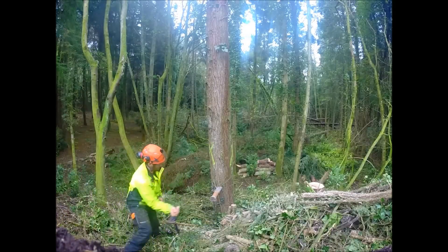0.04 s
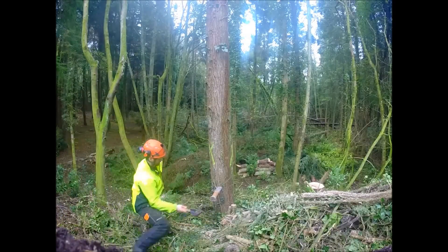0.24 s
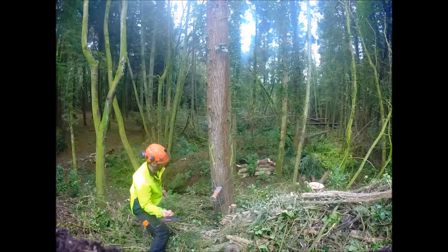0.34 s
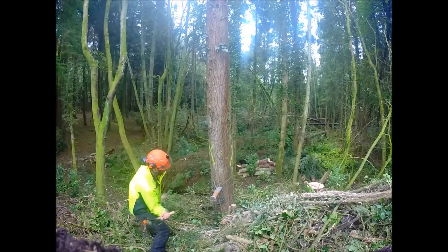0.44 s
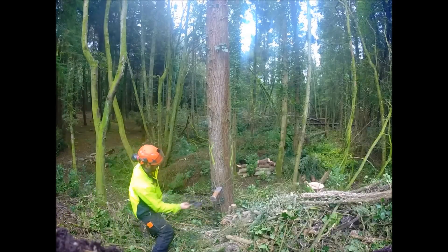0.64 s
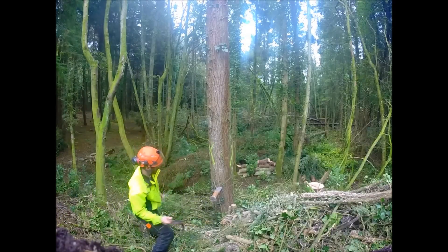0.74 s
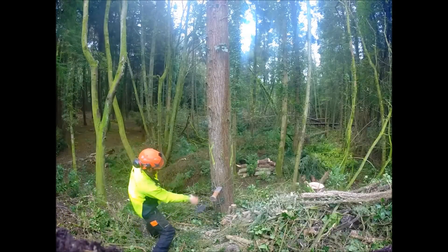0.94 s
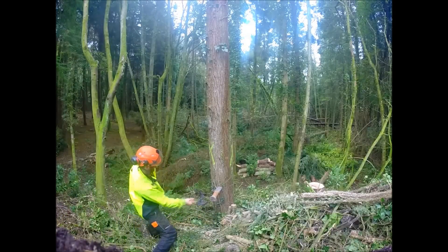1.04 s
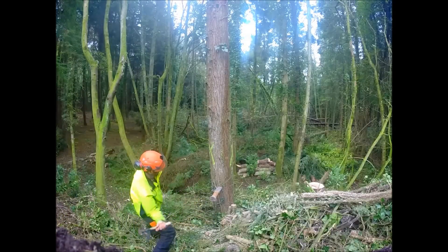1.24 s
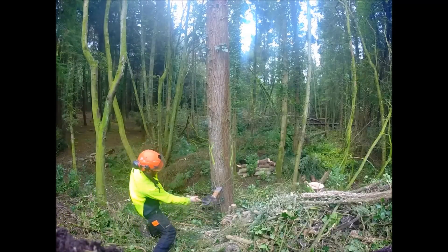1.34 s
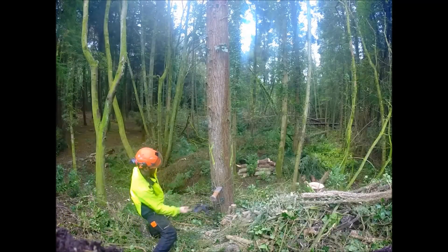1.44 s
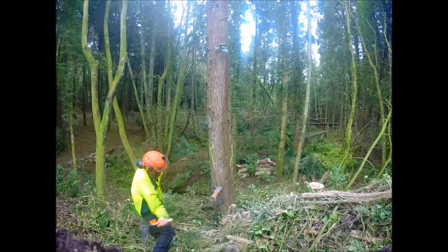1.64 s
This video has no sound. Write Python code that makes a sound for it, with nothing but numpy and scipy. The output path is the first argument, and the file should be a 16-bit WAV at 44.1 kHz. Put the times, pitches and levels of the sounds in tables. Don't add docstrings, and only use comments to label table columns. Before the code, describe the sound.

Hammer strikes a metal wedge in a standing tree, four even cracking blows in quiet woods

```python
import sys
import numpy as np
from scipy import signal
from scipy.fft import rfft, irfft
from scipy.io import wavfile
from scipy.ndimage import uniform_filter1d

SR = 44100
rng = np.random.default_rng(int(sys.argv[2]) if len(sys.argv) > 2 else 0)


def persist_wave(psi):
    counts = np.round(np.clip(psi, -1, 1) * 32767).astype(np.int16)
    wavfile.write(sys.argv[1], SR, np.atleast_2d(counts).T)


def volts_from_decibels(level):
    exponent = np.asarray(level, float) / 20
    return 10 ** exponent


N = 74970


def evened(x):
    return x / np.sqrt(np.mean(x ** 2) + 1e-20)


def read(points, hz):
    f, value = np.transpose(points)
    return np.interp(np.log(hz + 1), np.log(f + 1), value)


def along(curve):
    s, db = np.transpose(curve)
    return volts_from_decibels(np.interp(np.arange(N) / SR, s, db))


def add(mix, s, sound):
    part = mix[round(s * SR):][:len(sound)]
    part += sound[:len(part)]


def noise(colour, count=N):
    hz = np.fft.rfftfreq(count, 1 / SR)
    return evened(irfft(rfft(rng.standard_normal(count)) * volts_from_decibels(read(colour, hz)), count))


def band(hz, wide_hz, count=N):
    f = np.fft.rfftfreq(count, 1 / SR)
    resonance = 1 + ((f - hz) / wide_hz * 2) ** 2
    return evened(irfft(rfft(rng.standard_normal(count)) / resonance, count))


def strike(t, rise_s, t60):
    rise = np.sin(np.pi / 2 * np.minimum(t / rise_s, 1)) ** 2
    return rise * volts_from_decibels(-60 * np.maximum(t - rise_s, 0) / t60)


def lumps(span_s, depth_db):
    size = max(round(span_s * SR), 1)
    slow = uniform_filter1d(uniform_filter1d(rng.standard_normal(N), size), size)
    return volts_from_decibels(depth_db * evened(slow))


# (f/Hz, level/dB per Hz)
AIR = [(25, 19), (70, 4), (230, -1), (800, -4.5), (2000, -4), (3000, -8), (6000, -23), (16500, -46)]


def quiet_air():
    air = volts_from_decibels(-54) * noise(AIR) * lumps(0.1, 1.0)
    hollow = volts_from_decibels(-61.5) * band(1826, 350) * lumps(0.0086, 0.93)
    return air + hollow


# (t/s, level/dB)
SCUFF = [(0, -48), (.09, -49), (.15, -48.5), (.2, -50), (.45, -55.5), (.56, -47), (.62, -54), (.85, -56.5),
         (.97, -47), (1.05, -52.5), (1.25, -61.5), (1.35, -48), (1.45, -60.5), (1.7, -58.5)]
# (f/Hz, level/dB per Hz)
BRUSH = [(18, -34), (30, -5), (347, -5.5), (779, -8.5), (1100, -9), (1890, -14), (2430, -17), (3000, -41),
         (3900, -62), (6600, -120)]


def boots_in_brush():
    return volts_from_decibels(-3.0) * along(SCUFF) * noise(BRUSH) * lumps(0.0033, 2.0)


# (t/s, level/dB)
SWISH = [(0, -62.5), (.08, -62), (.17, -63), (.29, -73.5), (.35, -55.5), (.42, -59.5), (.47, -65.5),
         (.58, -61.5), (.75, -71), (.92, -66.5), (1.0, -61), (1.15, -74), (1.3, -69.5), (1.4, -65),
         (1.55, -72), (1.7, -67.5)]
# (f/Hz, level/dB per Hz)
CLOTH = [(1760, -26), (3000, -5), (4190, 2), (5120, -4), (8500, -3), (11600, -11), (13400, -8.5),
         (15800, -21), (16500, -41)]
# (t/s, share of treble added)
BRIGHTEN = [(0, 0.28), (.2, -0.23), (.36, -0.4), (.42, 2), (.5, .2), (.95, 0.084), (1.1, 0.23),
            (1.7, -0.16)]


def swishing_sleeves():
    weave = noise(CLOTH)
    treble = irfft(rfft(weave) * (np.fft.rfftfreq(N, 1 / SR) > 10500), N)
    bright = np.interp(np.arange(N) / SR, *np.transpose(BRIGHTEN))
    return along(SWISH) * (weave + bright * treble) * lumps(0.0063, 0.98)


# (t/s, peak level/dB, f/Hz, t60/s)
KNOCKS = [(.006, -36, 1760, 0.0027), (.147, -46, 1950, .012), (.153, -40, 970, .02),
          (.3835, -38, 565, 0.018), (.978, -45, 2100, .008), (.1462, -36, 614, 0.013),
          (0.156, -40.5, 1340, 0.014), (0.158, -44, 1910, 0.0086), (0.383, -37, 1490, 0.012),
          (.384, -37.5, 280, 0.029), (0.576, -45, 1690, 0.01), (0.9412, -35.5, 1850, 0.014),
          (.978, -36, 795, 0.021), (1.318, -33, 1840, 0.0061), (1.338, -30, 1560, 0.0068),
          (1.357, -38.5, 780, 0.01)]
# (t/s, peak level/dB, f/Hz, t60/s)
CLINKS = [
    (.0345, -31.5, 1246, 0.018),
    (.042, -36, 1240, 0.013),
    (.0445, -27, 1249, 0.027),
    (.0515, -34, 1280, 0.021),
    (.060, -42, 1215, .05),
    (.060, -48.5, 1710, 0.097),
    (.081, -45.5, 1860, 0.027),
]


def gear():
    out, t = np.zeros(N), np.arange(4000) / SR
    for table, rise_s in ((KNOCKS, 0.0008), (CLINKS, 0.0026)):
        for s, db, hz, t60 in table:
            overtone = volts_from_decibels(-14) * np.sin(2 * np.pi * hz * 1.52 * t)
            pair = np.sin(2 * np.pi * hz * t) + overtone
            add(out, s, volts_from_decibels(db) * strike(t, rise_s, t60) * pair)
    return out


# (f/Hz, t60/s)
SNAP = [(4700, 0.0048), (6300, 0.011), (8500, 0.0036), (11000, 0.0021), (13300, 0.0047)]


def snap(t, levels_db):
    out = 0
    for (hz, t60), db in zip(SNAP, levels_db):
        detune = rng.uniform(0.98, 1.03)
        out = out + volts_from_decibels(db) * strike(t, 0.00027, t60) * np.sin(2 * np.pi * hz * detune * t)
    return out


# (t/s, level/dB, t60/s, brightness/dB per octave)
TICKS = [
    (0.025, -53, .008, 5),
    (.297, -56, 0.0088, 10),
    (0.3817, -32.5, 0.016, -0.5),
    (.645, -50.5, .01, 4),
    (.806, -61.5, .006, 0),
    (1.0124, -55, 0.02, 8),
]
# (f/Hz, level/dB per Hz)
TICK = [(200, -8), (600, -4), (1800, 4.5), (4500, -2.5), (6300, -1.5), (8500, -4.5), (13300, -11),
        (16500, -26)]
# (t/s, level/dB, brightness/dB per octave)
SNAPS = [
    (0.3816, -30.5, 1),
    (.3824, -35, 3),
    (.3832, -33.5, 0),
    (0.3834, -40, -3),
    (.6131, -44, 14),
    (.6455, -51, 4),
         (1.0119, -42, 4),
    (1.0131, -50, 8),
]
TWIG_DB = [-9, -3, 0.5, -9, -1]


def twigs():
    out, t = np.zeros(N), np.arange(4000) / SR
    for s, db, t60, tilt_db in TICKS:
        colour = [(hz, level + tilt_db * np.log2(hz)) for hz, level in TICK]
        add(out, s, volts_from_decibels(db) * noise(colour, count=len(t)) * strike(t, 0.0006, t60))
    for s, db, tilt_db in SNAPS:
        levels_db = [db + twig_db + tilt_db * np.log2(hz / 8500)
                     for (hz, _), twig_db in zip(SNAP, TWIG_DB)]
        add(out, s, snap(t, levels_db))
    return out


# (f/Hz, level/dB)
HUM = [(1707, -60), (1832, -60), (1950, -65)]


def head_hum():
    t, out = np.arange(N) / SR, np.zeros(N)
    for hz, db in HUM:
        out += volts_from_decibels(db + 5.5) * lumps(0.011, 2.2) * np.sin(2 * np.pi * (hz * t + rng.random()))
    swell = np.clip((t - 0.22) / 0.07, 0, 1)
    damping = np.clip((0.59 - t) / 0.024, 0, 1)
    return swell * damping * out


# (f/Hz, level/dB per Hz)
FAR = [(150, -29.5), (504, -10.5), (805, -0.5), (960, -4.5), (1830, 2.5), (2060, 1.5), (2700, -4),
       (4300, -12.5), (16000, -38.5)]
# (f/Hz, level/dB per Hz)
SHAKE = [(2500, -5), (3500, 11.5), (4800, 5), (5600, -4), (7000, -1), (10000, -6.5), (14000, -12),
         (16500, -22.5)]


def scatter(t, hz, echo_db, shake_db):
    far = volts_from_decibels(-43) * noise(FAR, count=len(t)) * strike(t, 0.021, 0.87)
    echo = volts_from_decibels(echo_db) * band(1.015 * hz, 296, count=len(t)) * strike(t, 0.0076, 0.42)
    shaken = volts_from_decibels(shake_db - 53.5) * noise(SHAKE, count=len(t)) * strike(t, 0.017, 0.34)
    return far + echo + shaken


# (f/Hz, level/dB per Hz)
NEAR = [(60, -15), (250, 4), (400, -8.5), (560, 4.5), (785, 2.5), (1370, 1), (1860, 2.5), (2780, -7),
        (14000, -38), (16000, -49)]
# (f/Hz, t60/s)
NEAR_T60 = [(100, 0.088), (500, 0.11), (1500, 0.16), (4000, 0.06), (12000, 0.027)]


def near_trees(t):
    hz, s, z = signal.stft(noise(NEAR, count=len(t)), SR, nperseg=256, noverlap=192)
    t60 = np.abs(read(NEAR_T60, hz))[:, None]
    near = signal.istft(z * volts_from_decibels(-60 * s / t60), SR, nperseg=256, noverlap=192)[1][:len(t)]
    return volts_from_decibels(-20) * near * np.minimum(t / 0.0019, 1)


PUSH_S = 0.0016
# (f/Hz, level/dB, t60/s)
TRUNK = [(73.8, -50.5, 0.58), (120.4, -39, 0.218), (167.4, -33, 0.21), (230.5, -29.5, 0.14),
         (300.8, -30.5, 0.14), (491, -32.5, 0.12), (581, -35.5, 0.2), (655, -35.5, 0.19)]


def trunk_wave(t, late_s):
    push_hz, push_wide_s = 947, 0.00034
    u = t - PUSH_S
    offset = np.exp(-.5 * (2 * np.pi * push_hz * push_wide_s) ** 2)
    out = -volts_from_decibels(-2.5) * np.exp(-.5 * (u / push_wide_s) ** 2) * (np.cos(2 * np.pi * push_hz * u) - offset)
    for k in range(5):
        loss_db = -9 * k
        u = t - late_s - 0.0116 - k * 0.0113
        falling_hz = 809 - .5 * 50000 * u
        bump = np.exp(-.5 * (u / 0.0007) ** 2)
        out -= volts_from_decibels(-8 + loss_db) * bump * np.cos(2 * np.pi * falling_hz * u + k * 1.54)
        late = np.maximum(u, 0)
        out += volts_from_decibels(-32.5 + loss_db) * strike(late, 0.00089, 0.01) * np.sin(2 * np.pi * 3750 * late)
    for hz, db, t60 in TRUNK:
        out += volts_from_decibels(db) * strike(t, 0.0022, t60) * np.sin(2 * np.pi * hz * t)
    return out


# (share of main pitch, level/dB, t60/s)
WEDGE = [(.68, -45, 0.016), (.8, -16.5, 0.023), (1.33, -15.5, 0.01), (1.9, -27, 0.0034),
         (2.25, -27.5, 0.015), (2.62, -27.5, 0.01)]


def wedge_ring(t, hz, t60, upper_db, lower_db, middle_db):
    seat_s = 0.0017
    ring = -volts_from_decibels(-2.5) * strike(t, seat_s, t60) * np.cos(2 * np.pi * hz * (t - PUSH_S))
    stirred = [lower_db] * 2 + [middle_db] + [upper_db] * 3
    for k, ((share, db, decay), stir_db) in enumerate(zip(WEDGE, stirred)):
        mode = strike(t, seat_s, decay) * np.sin(2 * np.pi * hz * share * (t - PUSH_S))
        ring += (-1) ** k * volts_from_decibels(db + stir_db) * mode
    return ring


# (f/Hz, level/dB per Hz)
CRACK = [(2000, 1.5), (3500, -1), (4800, -5.5), (5800, -13), (8300, -1.5), (10000, -9.5), (13000, -12),
         (16500, -34.5)]


def steel_crack(t, crack_db, snap_db, touch_db, touch_hz):
    touch = volts_from_decibels(touch_db - 18) * strike(t, 0.00091, 0.011) * np.sin(2 * np.pi * touch_hz * t)
    burst = volts_from_decibels(crack_db) * noise(CRACK, count=len(t)) * strike(t, 0.00063, 0.013)
    return burst + snap(np.maximum(t - 0.000493, 0), snap_db) - touch


# (t/s of first contact, strength level/dB, wedge f/Hz, wedge t60/s, crack level/dB)
BLOWS = [
    (0.2043, -1.5, 1828, 0.019, -27.5),
    (0.6102, -2, 1846, 0.003, -18),
    (1.0286, -2, 1904, 0.015, -21.5),
    (1.4131, -2, 1912, 0.0029, -17.5),
]
STIRS = [(2, -17, -8, -34.5, -10), (3.5, -5, -2, -49, 4), (-32, 3.5, 2, -39, 0), (6, 1.5, -1.5, -49, 9.5)]
# (first touch level/dB, touch f/Hz, wave late by t/s)
LANDS = [(-4.5, 2910, 0.000091), (0.5, 2710, 0.00027), (-5, 2690, 0.00025), (-1, 2850, 0.00024)]
SNAP_DB = [(-41, -26.5, -42, -46, -45), (-32, -38, -26, -32, -31), (-35, -38, -25, -24, -26.5),
           (-39, -42, -26.5, -31, -26)]


def hammer_blows():
    out, t = np.zeros(N), np.arange(SR // 2) / SR
    near = near_trees(t)
    for row, stir, land, snap_db in zip(BLOWS, STIRS, LANDS, SNAP_DB):
        start, strength_db, hz, t60, crack_db = row
        upper_db, lower_db, middle_db, echo_db, shake_db = stir
        touch_db, touch_hz, late_s = land
        hit = wedge_ring(t, hz, t60, upper_db, lower_db, middle_db)
        hit = hit + steel_crack(t, crack_db, snap_db, touch_db, touch_hz)
        hit = hit + trunk_wave(t, late_s)
        answer = scatter(t, hz, echo_db, shake_db) + near
        add(out, start, volts_from_decibels(strength_db) * (hit + answer))
    return out


def scene():
    wood = quiet_air() + boots_in_brush() + swishing_sleeves()
    small = gear() + twigs() + head_hum()
    return (wood + small + hammer_blows())[None]


def band_limit(x):
    return signal.sosfilt(signal.butter(12, 16860, fs=SR, output="sos"), x)


def record(dry):
    t, hz = np.arange(N) / SR, np.fft.rfftfreq(N, 1 / SR)
    look_ahead_s, ceiling, knee = 0.004, .96, 8
    duck = sum(np.clip(3 * (1.2 + (t - s) / look_ahead_s), 0, 1) * (t < s) for s, *_ in BLOWS)
    x = dry * volts_from_decibels(-13 * duck)
    x = x / (1 + np.abs(x / ceiling) ** knee) ** (1 / knee)
    ratio = 75 / (hz + 1)
    low_cut = 1 - ratio ** 2 - 1.4j * ratio
    high_cut = 1 + (hz / 16500) ** 60
    x = irfft(rfft(x) / low_cut / high_cut, N)
    return band_limit(x)


dry = scene()
out = record(dry)
persist_wave(out)
```